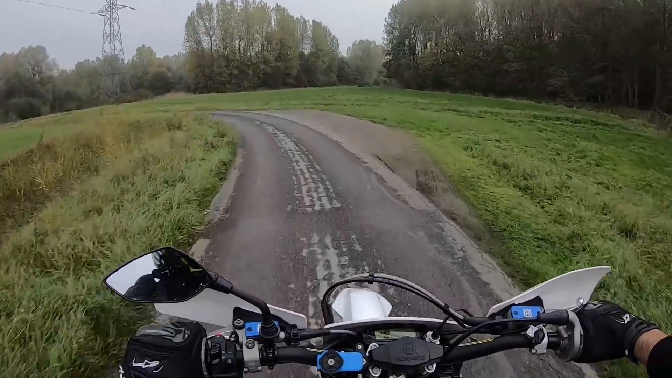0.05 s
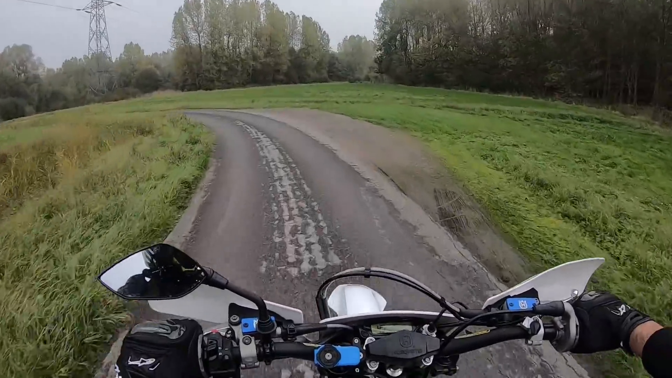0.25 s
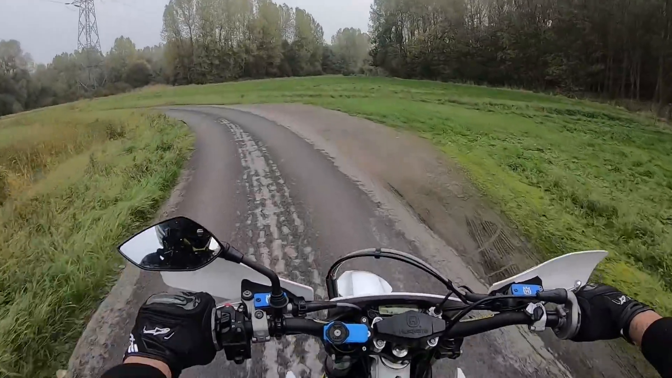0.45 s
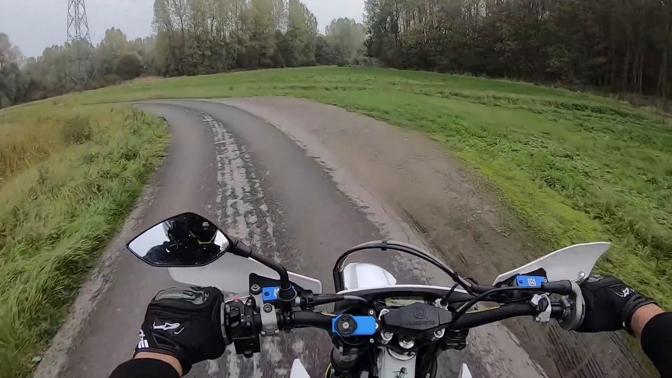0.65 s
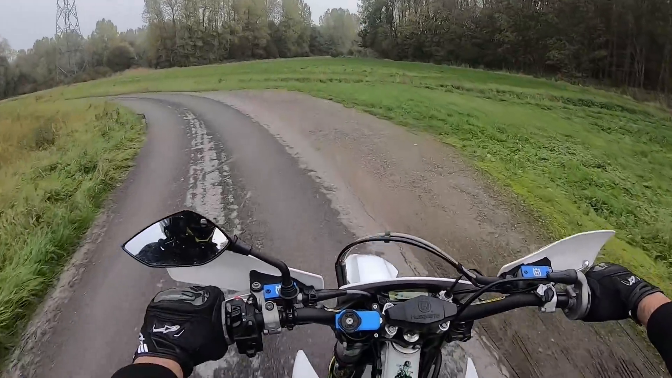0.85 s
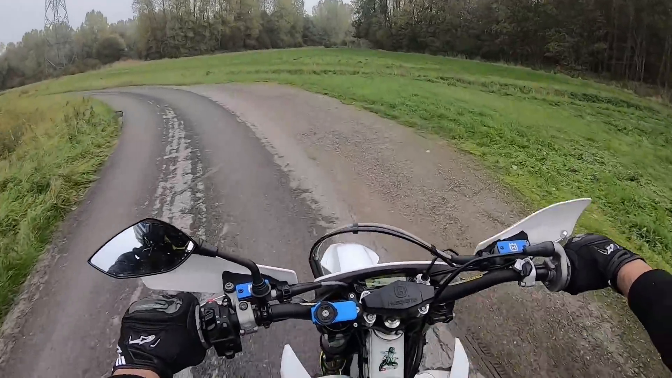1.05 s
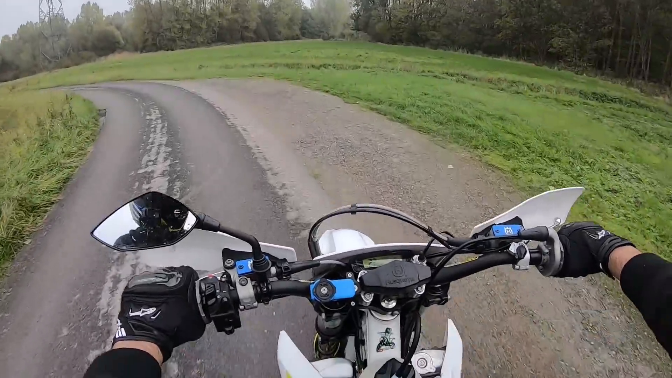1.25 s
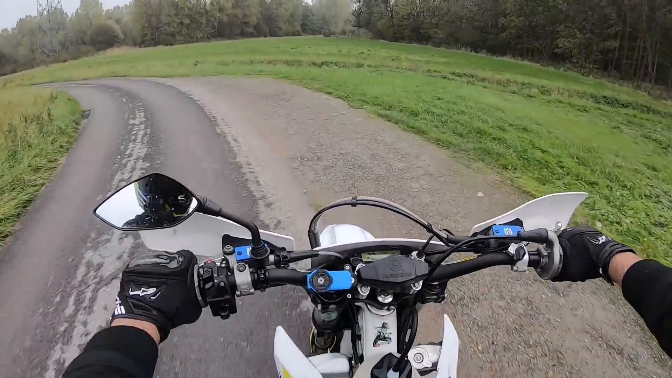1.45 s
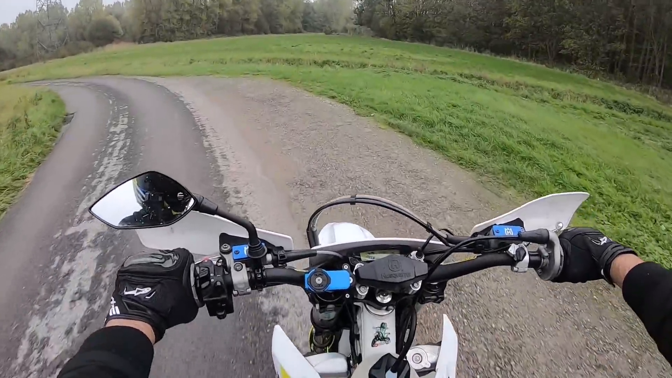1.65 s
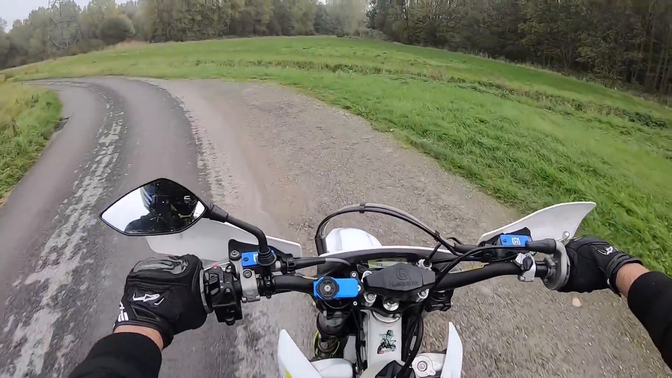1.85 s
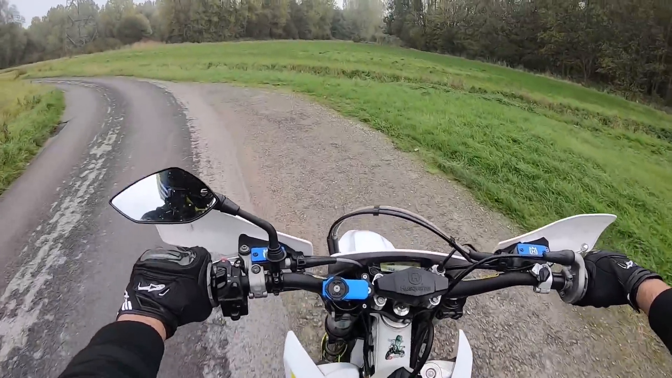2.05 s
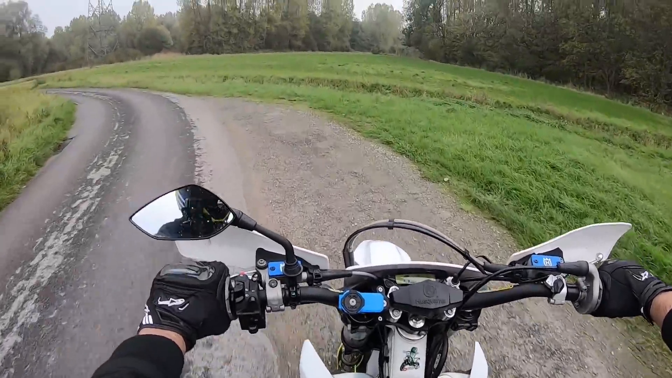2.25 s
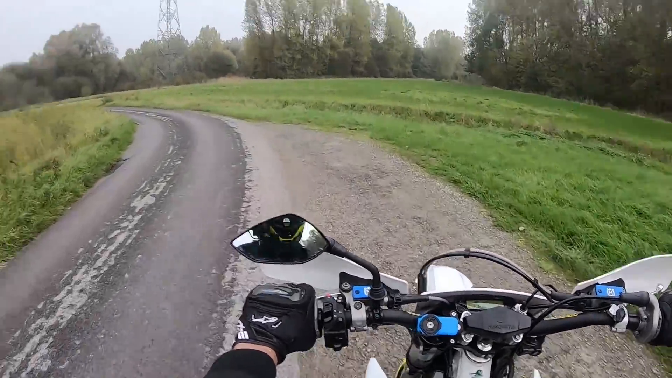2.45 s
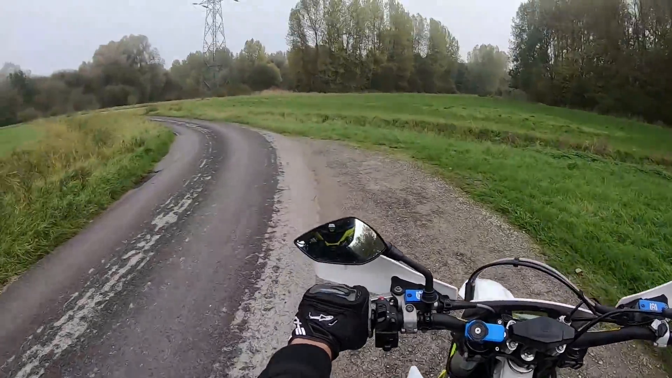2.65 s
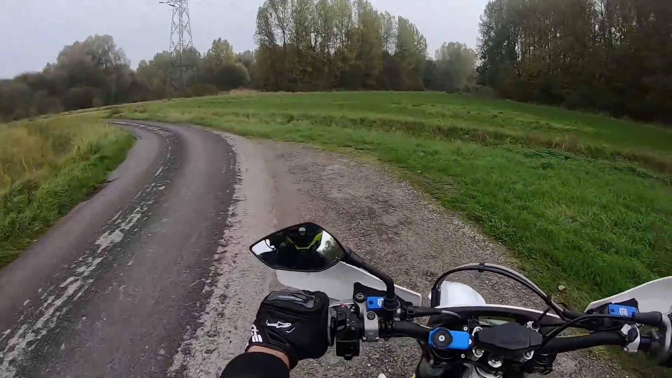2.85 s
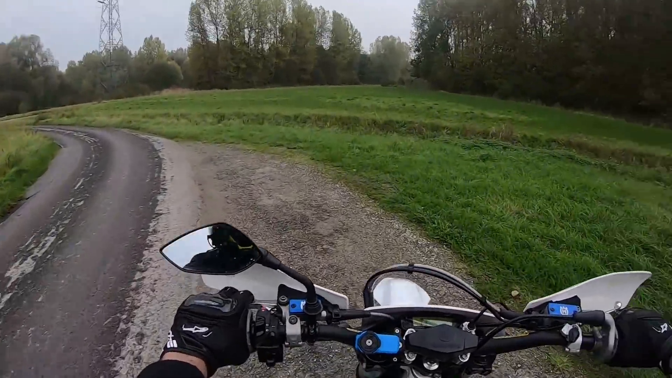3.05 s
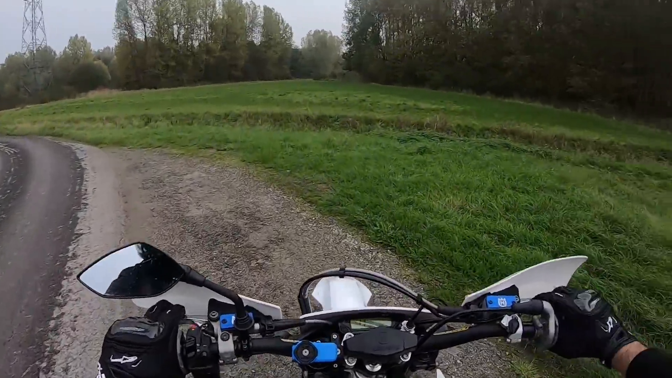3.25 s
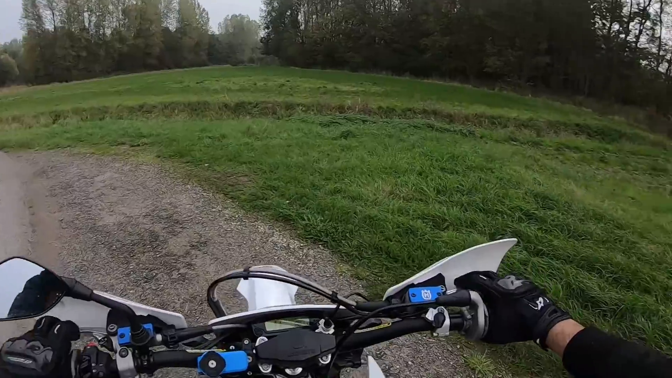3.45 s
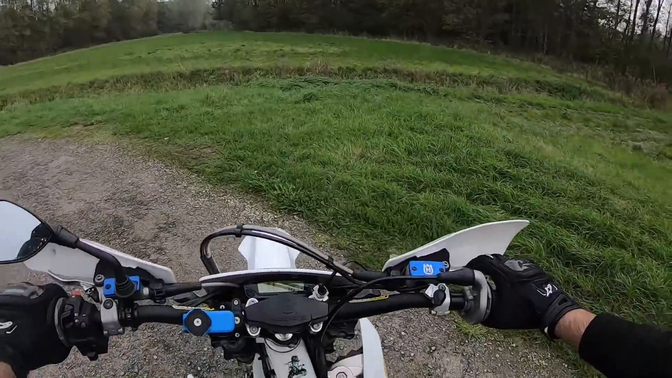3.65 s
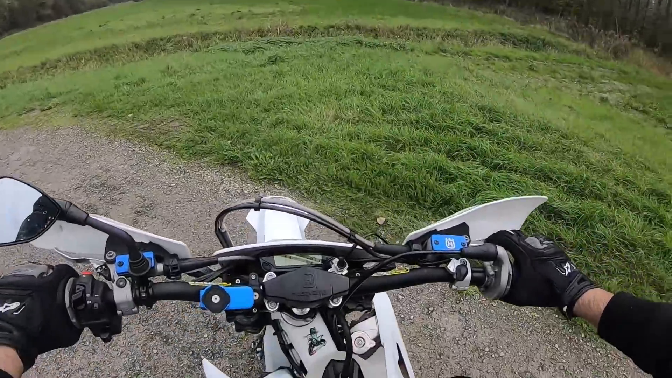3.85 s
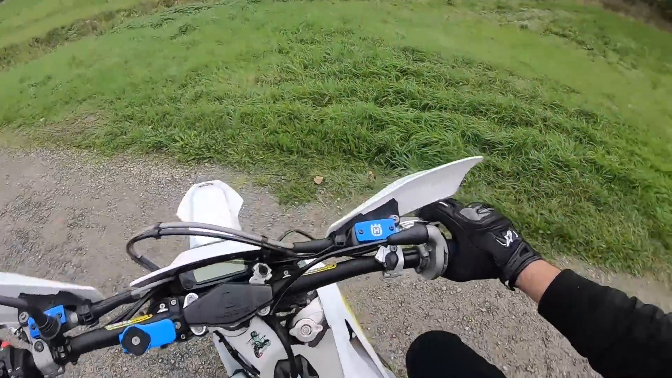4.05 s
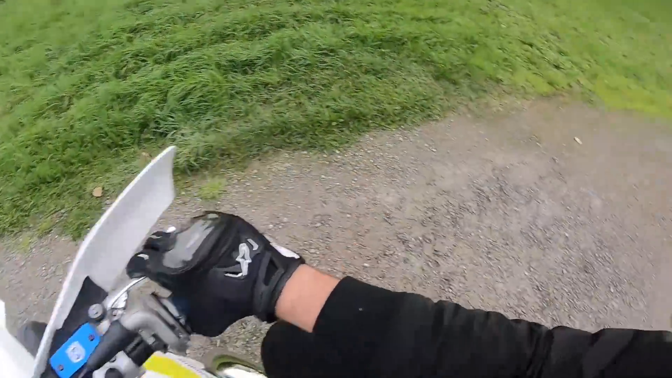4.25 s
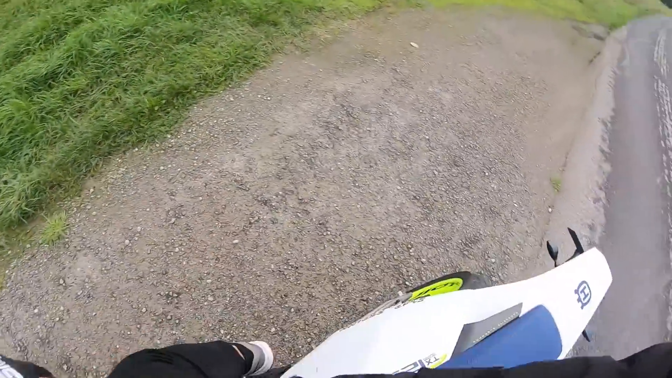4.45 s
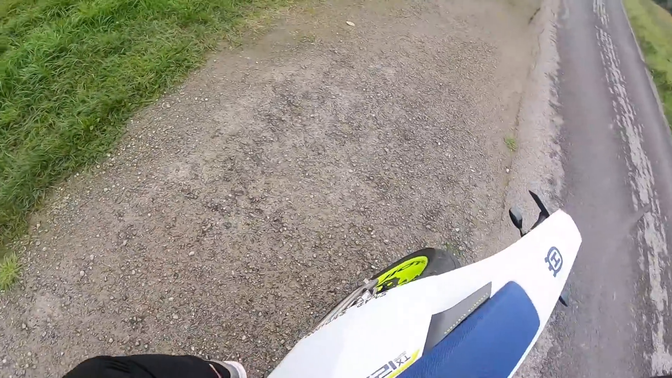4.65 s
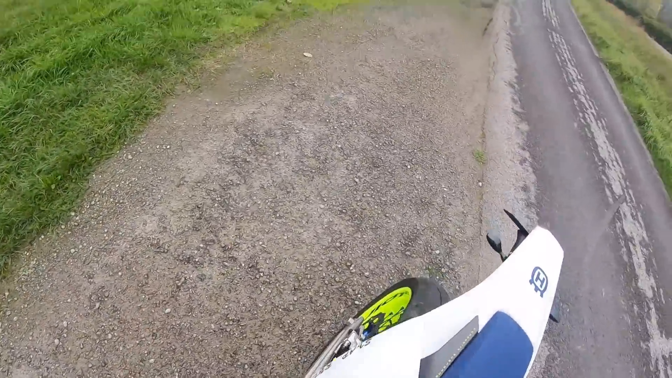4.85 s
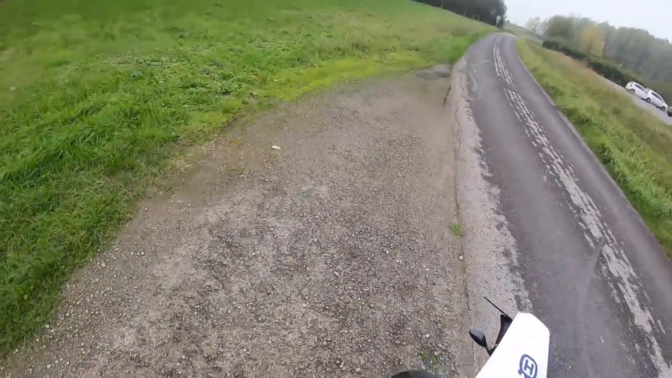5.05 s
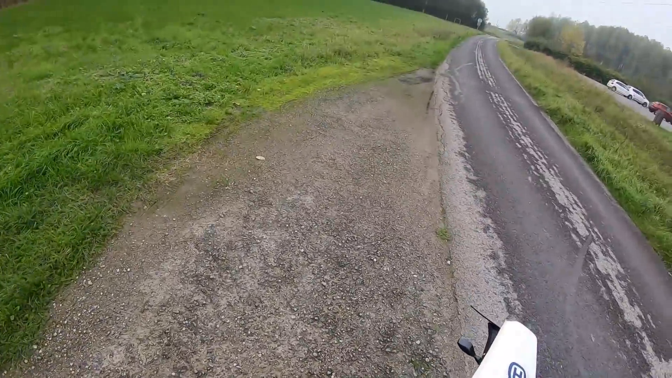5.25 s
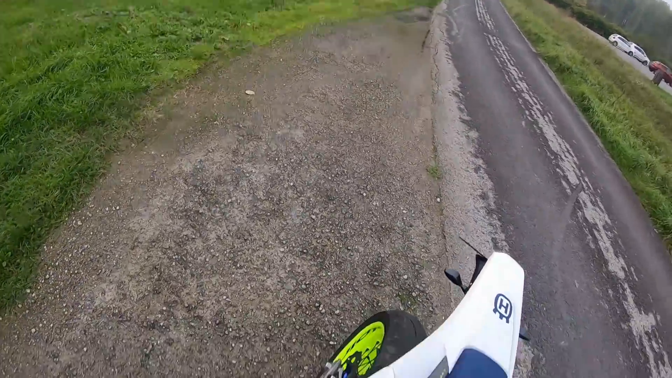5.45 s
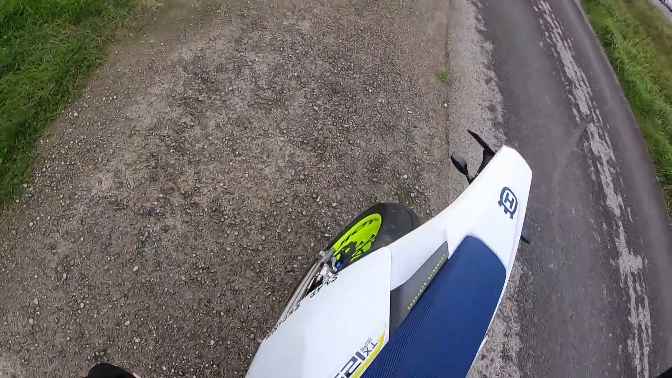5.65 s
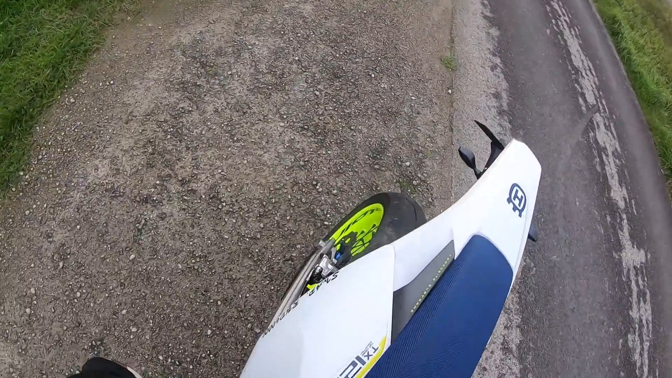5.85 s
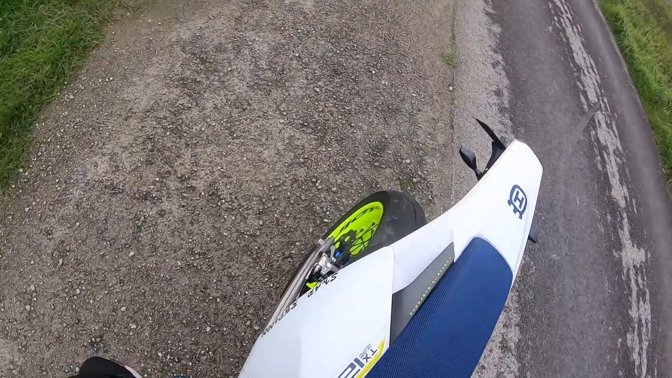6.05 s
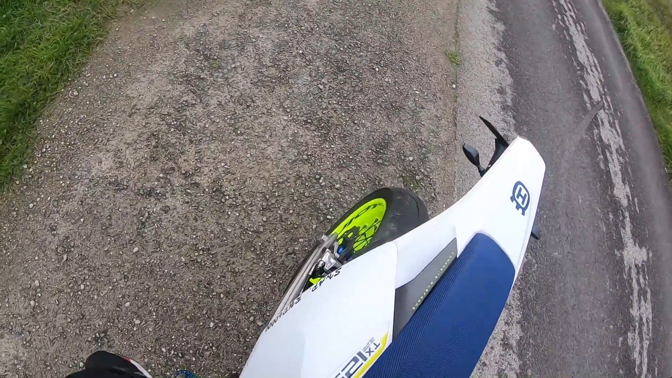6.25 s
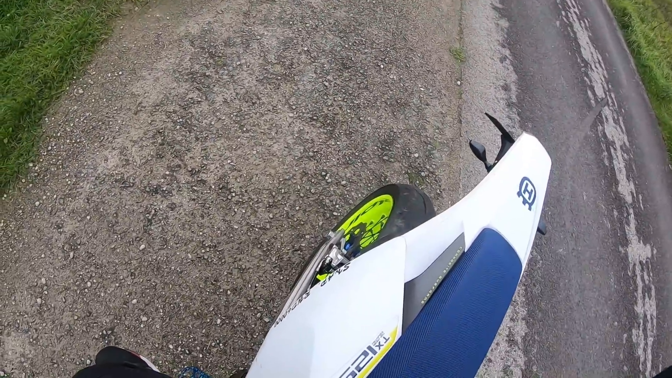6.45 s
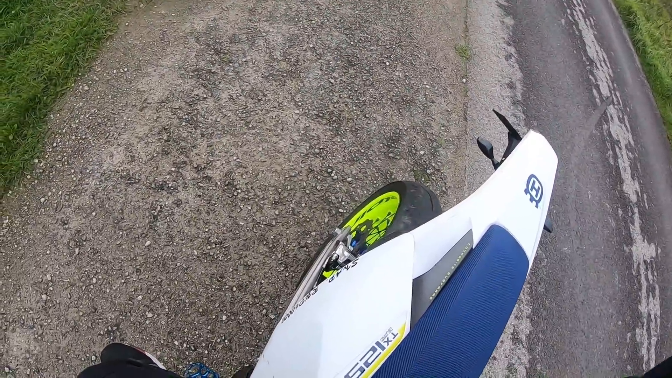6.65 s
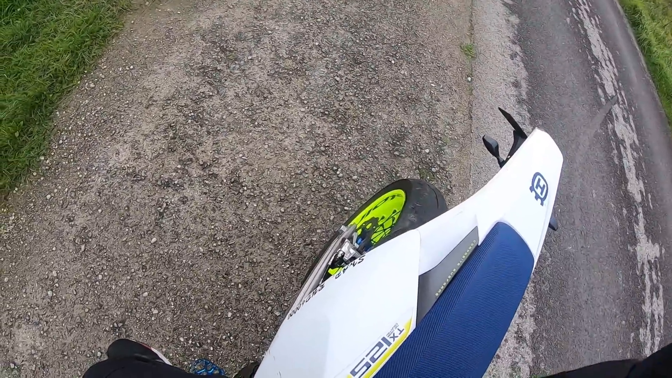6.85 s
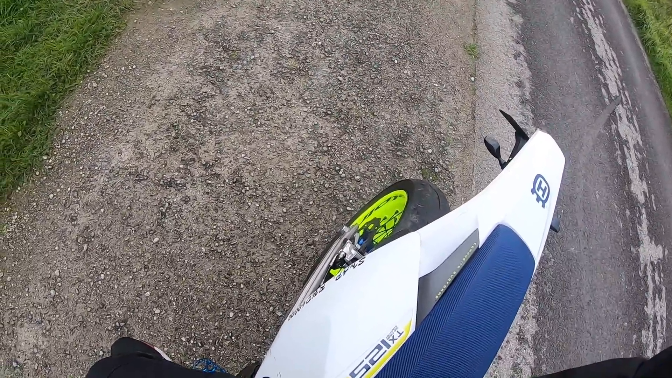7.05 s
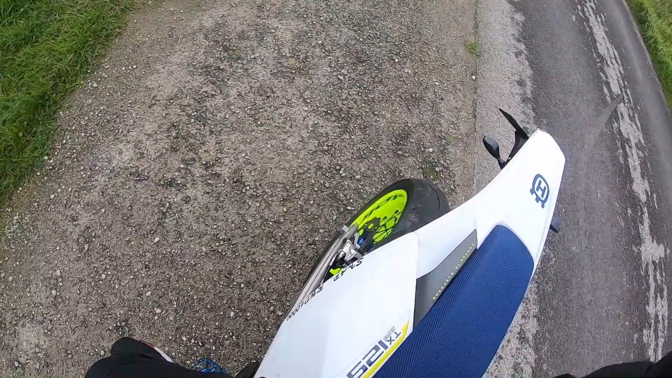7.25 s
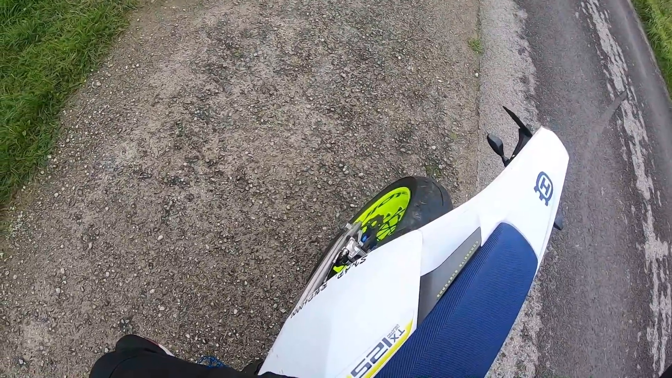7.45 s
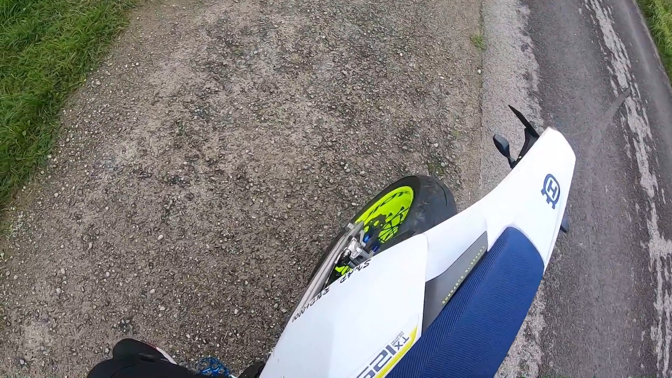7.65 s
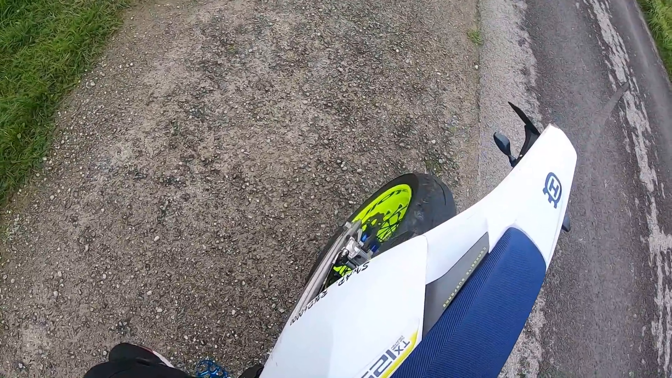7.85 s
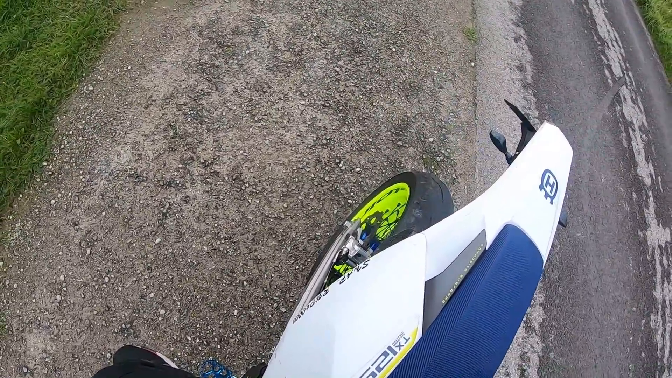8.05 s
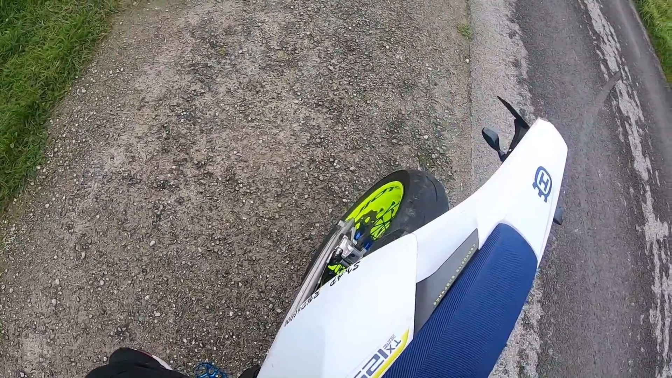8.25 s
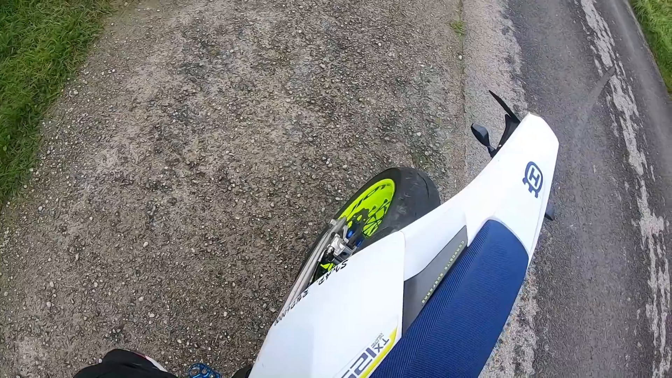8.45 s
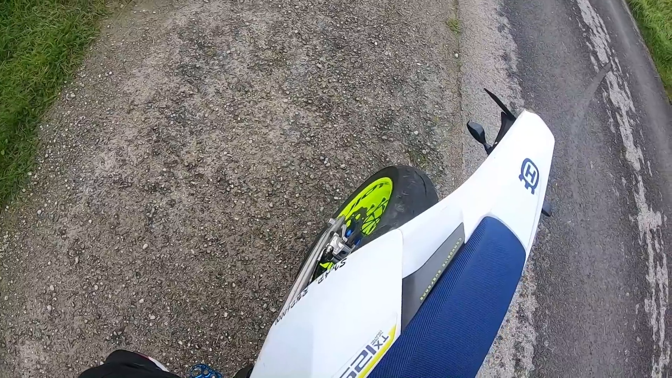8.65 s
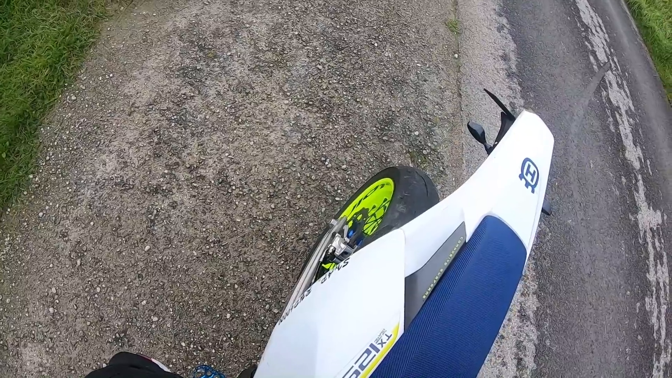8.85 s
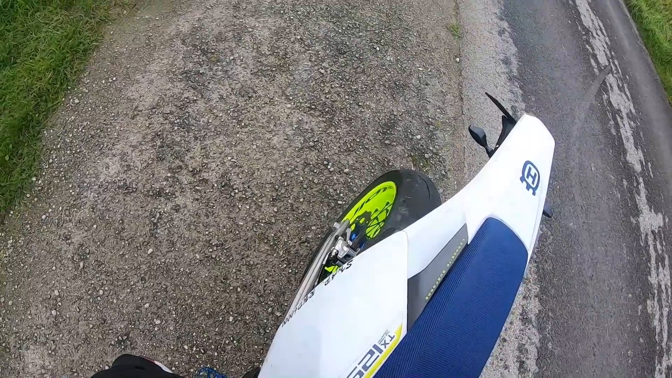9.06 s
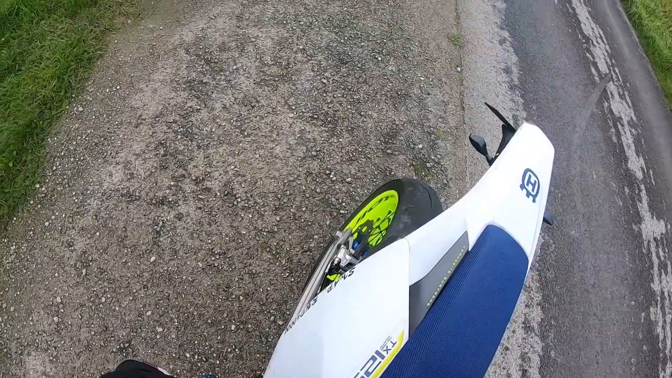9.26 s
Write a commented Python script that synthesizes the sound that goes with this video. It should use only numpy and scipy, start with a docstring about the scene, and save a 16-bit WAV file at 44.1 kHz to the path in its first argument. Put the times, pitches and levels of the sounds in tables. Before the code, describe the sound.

Heard from the rider's helmet, a small dirt bike hums down, putters irregularly at idle, then revs sharply three times, ending in a held, choppy scream.

```python
"""Two-stroke motorcycle idling and revving

A small two-stroke, heard from the rider's helmet, coasts to a stop under a droning hum, tyre roar and rattle.
It idles, firing only every few turns: each firing cracks and thumps, and unfired turns ring the air column.
Three throttle blips in neutral follow, the last into the rev limiter: crank orders plus rasp gated each turn.
Low noise buffets the microphone and fades during the blips, and a low rumble swells again with the rough
burning against the limiter; a squeak of metal whistles once near the end of the idle."""
import sys
import numpy as np
from scipy import signal
from scipy.fft import rfft, irfft, next_fast_len
from scipy.io import wavfile
from scipy.ndimage import uniform_filter1d, map_coordinates

SR = 44100
rng = np.random.default_rng(int(sys.argv[2]) if len(sys.argv) > 2 else 0)


def convert_level_to_amplitude(level_db):
    """Map a level in decibels to its linear amplitude factor."""
    exponent = np.asarray(level_db, float) / 20
    return 10 ** exponent


def generate_wav(signal):
    """Clip the signal to [-1, 1] and save it as 16-bit WAV at the path in sys.argv[1]."""
    frames = np.transpose(np.atleast_2d(signal))
    scaled = np.clip(frames, -1, 1) * 32767
    pcm = np.round(scaled).astype(np.int16)
    wavfile.write(sys.argv[1], SR, pcm)


N = 410130
T = np.arange(N) / SR  # time of each sample, s

# coasting down: time_s, crank_hz (turns per s), drone_db
COASTING = [(.04, 61.5, -16.5), (.22, 56, -17.5), (.58, 46.5, -21.5), (.81, 40.2, -24), (.95, 36.5, -16.5),
            (1.05, 33.8, -25)]
# mean idle speed: time_s, crank_hz
IDLING = [(1.23, 33), (1.4, 38), (1.6, 43), (1.75, 46), (2.3, 48), (2.55, 44), (2.8, 40), (3.1, 38.5),
          (4.5, 40), (5.3, 41.5), (5.85, 42.5)]
# speed through the throttle blips: time_s, crank_hz
REVVING = [(5.898, 39), (5.96, 49), (6.031, 60.9), (6.12, 90.1), (6.19, 125), (6.249, 139), (6.31, 132.6),
           (6.501, 126.7), (6.69, 117.3), (6.72, 118.5), (6.761, 135), (6.87, 201), (6.91, 216),
           (6.99, 223), (7.03, 227), (7.29, 206.9), (7.57, 187.7), (7.92, 165.3), (8.22, 149.2),
           (8.37, 143.6), (8.419, 143), (8.49, 185), (8.52, 205), (8.59, 220.5), (8.67, 225), (8.95, 231.7),
           (9.3, 228)]
# throttle blips: throttle_opens_s, charge_catches_s, throttle_shuts_s
BLIPS = [(5.85, 5.907, 6.12), (6.64, 6.705, 7.038), (8.318, 8.401, 9.5)]

# burning under an open throttle: crank_hz, order1_db, order2_db, order3_db, order4_db,
# upper_orders_db, rasp_db, clatter_db
OPEN_THROTTLE = [(45, -22, -6, -2.5, -4, -36, -54, -28), (86.6, -33, -9.5, -12.5, -26, -49, -51, -25),
                 (116.5, -23, -8.5, -40, -16, -49, -49.5, -21),
                 (131.5, -10, -20, -11.5, -24.5, -28.5, -29, -21),
                 (166.4, -9, -25, -18, -20, -36, -27, -31.5), (187, -7.5, -23, -18.5, -34, -31, -28.5, -40),
                 (206.83, -8.5, -20, -16.5, -37, -31.5, -32, -46),
                 (221.5, -14.5, -12.5, -27, -30, -36.5, -41.5, -47),
                 (226.2, -12.5, -13, -33, -39.5, -39.5, -45.5, -26.5)]
# freewheeling under a shut throttle: same columns
SHUT_THROTTLE = [(116, -18, -23.5, -46, -26, -47.5, -56, -38),
                 (127.4, -19.5, -30.5, -43, -33, -48.5, -52, -41),
                 (135.4, -19, -37, -39, -43, -61, -63.5, -41),
                 (138.5, -11, -31, -31, -28, -46, -47.5, -26.5),
                 (156.4, -11, -26, -44, -39, -43, -46.5, -38.5),
                 (174, -10, -20.5, -37, -38, -46.5, -46, -38.5),
                 (189, -11.5, -30, -47.5, -45.5, -45.5, -48, -35.5),
                 (197, -19, -24, -51, -48, -45, -47, -37), (199.9, -31, -24.5, -40, -47, -45, -47.5, -37),
                 (204.6, -17.5, -31, -46, -46, -44, -49, -40), (216, -10.5, -39, -45, -50, -51, -49, -41.5),
                 (226.6, -8.5, -29.5, -32, -41, -45, -48, -44)]
# intake honk while it gulps air before the charge catches: level_db of orders 1 to 4
HONK_DB = [-47, -9, -20.5, -31]
# uneven burning, each blow unlike the last: crank_hz, blow_scatter (0-1)
UNEVEN_BURNING = [(45, .2), (75, .06), (115, .06), (130, .1), (150, .1), (170, .02), (222, .02),
                  (229, .035)]
# turns that the rev limiter leaves unfired: time_s
LIMITER_CUTS = [8.723, 8.845, 8.902, 8.959, 9.031, 9.107, 9.197, 9.26]

# turns that fire at idle: time_s, crack_db
IDLE_FIRINGS = [(1.0809, -35), (1.231, -33.5), (1.322, -31.5), (1.4024, -33.5), (1.48, -29.5),
                (1.5572, -31.5), (1.631, -30.5), (1.7195, -31), (1.8059, -33.5), (1.8921, -36),
                (1.955, -32.5), (2.019, -33), (2.1005, -35), (2.2029, -31), (2.3063, -38), (2.3926, -41),
                (2.5046, -34.5), (2.6413, -32.5), (2.7814, -32.5), (2.9077, -35), (3.0159, -33),
                (3.1483, -32.5), (3.3072, -33.5), (3.4355, -30), (3.563, -29), (3.6849, -34), (3.79, -30),
                (3.923, -28), (4.0529, -28.5), (4.1822, -28), (4.3113, -31.5), (4.4332, -33.5),
                (4.5306, -35.5), (4.6288, -33.5), (4.7299, -34.5), (4.8292, -36), (4.9326, -33.5),
                (5.061, -35.5), (5.183, -35.5), (5.3037, -35.5), (5.4222, -34.5), (5.5378, -36.5),
                (5.631, -35.5), (5.7495, -33.5), (5.8662, -34)]
# sharp firings while revving: time_s, crack_db
REV_FIRINGS = [(5.9604, -32), (6.227, -27), (6.715, -31), (7.0184, -30), (8.4014, -27.5), (8.6914, -26),
               (8.761, -28.5), (8.813, -27.5), (8.8304, -26), (8.8913, -25), (8.9312, -33.5),
               (8.9482, -26.5), (9.0005, -27), (9.0185, -30.5), (9.0574, -31), (9.0968, -25.5),
               (9.1372, -27.5), (9.1771, -29), (9.1851, -28.5), (9.238, -26.5), (9.2869, -33)]
# casing modes rung by a firing: mode_hz, level_db, t60_s
CASING_MODES = [(2620, -8, .06), (3150, -6, .07), (4150, -2, .11), (6210, -6, .08), (7200, -5, .05)]
# gulp of gas on each unfired idle turn, and on every turn through the first blip; the rings grow as the rider
# turns to the tail pipe: # time_s, level_db, main_ring_hz, main_ring_t60_s, middle_ring_db, upper_ring_db
GULPS = [(1, -30, 214, 0.045, -26, -32), (1.18, -25, 215, .05, -24, -31), (1.22, -1, 207, 0.062, -22, -21),
         (1.7, -1.5, 212, 0.074, -20, -17), (2.2, -8.5, 224.7, 0.2, -17, -16.5),
         (2.6, -6.5, 199.5, 0.064, -32, -24), (3.4, -8.5, 203, 0.05, -37, -27),
         (4.2, -7, 199, 0.034, -18, -22), (4.8, -6.5, 174.8, 0.088, -13.5, -13),
         (5.86, -5, 189, 0.06, -7.5, -12), (5.93, 1, 239, 0.089, 0.5, -12), (6.1, -4, 229, 0.11, 5, -3.5),
         (6.24, -9, 221, 0.026, -6.5, -5.5)]

# tone of the upper exhaust orders through the pipe: freq_hz, gain_db
PIPE_TONE = [(290, -37), (500, 22), (677, -1.5), (900, -8.5), (1140, -5.5), (1600, -16.5), (1790, -18.5),
             (2220, -11.5), (2780, -19), (3400, -21.5), (4300, -21.5), (5200, -35.5), (6760, -32.5),
             (11400, -120)]
# bright rasp of burning: freq_hz, relative_db
RASP_TONE = [(590, -25), (1000, -1.5), (1290, 12), (1780, -47), (2310, 13), (2750, -0.5), (3270, 7),
             (4890, -5), (5540, 3.5), (6740, -3), (7220, -0.5), (9630, -6.5), (15600, -11)]
# dull hiss of the unburnt charge: freq_hz, relative_db
OVERRUN_TONE = [(880, -34.5), (1500, -52), (1740, -40), (2160, -1), (2810, -20.5), (3130, -1.5),
                (3660, -11), (4000, -8.5), (4770, -18), (5470, -8), (6650, -15.5), (7550, -11.5),
                (15600, -29)]
# crack of a firing: freq_hz, relative_db
CRACK_TONE = [(590, -5), (1000, 2.5), (1680, -10), (2040, 1.5), (3580, -2.5), (4310, -3), (4890, -10.5),
              (7480, -0.5), (8580, -8.5), (15600, -13)]
# knock of the piston just before a firing: freq_hz, relative_db
KNOCK_TONE = [(700, -24), (1150, 5), (1700, 0), (2200, -4), (3200, -2.5), (4800, -15), (7500, -17.5),
              (15600, -32)]
# orders of the coasting hum: crank_multiple, relative_db
HUM_ORDERS = [(1, -6), (2, 0), (3, -0.5), (4, -1), (5, -0.5), (6, -1), (7, -13.5), (8, -21.5)]
# tyre roar: freq_hz, relative_db
ROAR_TONE = [(30, -9), (60, 2.5), (250, 1), (420, -9.5), (700, -45.5), (1500, -58.5), (9000, -110)]
# engine clatter: freq_hz, relative_db
CLATTER_TONE = [(70, -31), (140, 8), (300, -5), (345, -6), (420, -3), (600, -6), (760, -13.5),
                (1220, -18.5), (1730, -34), (2200, -26), (3090, -31), (4990, -43.5), (7410, -41.5),
                (15600, -75.5)]
# engine clatter before the blips: time_s, level_db
LOW_SPEED_CLATTER = [(0, -25.5), (.5, -27.5), (1.1, -30.5), (2.2, -30), (4.2, -29.5), (4.9, -32),
                     (5.85, -31.5)]
# rattling bursts as the bike slows: start_s, length_s, level_db
RATTLE_BURSTS = [(0.269, 0.012, -23), (0.322, 0.026, -17.5), (0.387, 0.04, -20.5), (0.457, 0.0092, -21.5),
                 (0.537, 0.0098, -15.5), (0.582, 0.08, -17), (0.726, 0.074, -17.5), (0.871, 0.012, -14.5)]
# rattle: freq_hz, relative_db
RATTLE_TONE = [(180, 10), (300, 11.5), (441, 1), (577, -4), (937, 0.5), (1300, -4.5), (1800, -22),
               (2230, -14.5), (9000, -50), (11700, -76), (19800, -120)]
# low rumble strength, wind buffeting at first, rough burning against the limiter late on: time_s, level_db
RUMBLE_LEVEL = [(0, -17), (.7, -15), (.96, -22), (4.5, -22.5), (5.5, -22), (5.62, -16), (5.93, -26.5),
                (6.1, -33.5), (6.4, -77), (6.8, -47), (7.03, -35), (7.15, -62.5), (8.33, -56), (8.43, -43),
                (8.6, -41), (8.7, -29.5), (9.3, -23.5)]
# low rumble: freq_hz, relative_db
RUMBLE_TONE = [(4, -10), (10, 0), (18, -5), (35, -12), (70, -18), (150, -27), (400, -43), (900, -70),
               (8000, -72), (14000, -80)]

CATCH_S, SHUT_S = 0.014, 0.04  # how long burning takes to start and to stop
LOW_RING_DB = -8.5  # beside the main ring of a gulp
THUMP_DB, SILENCER_DB = -7.5, -13.5  # parts of an idle firing
PIPE_DB, PING_DB = -0.5, -17  # over the middle ring of the gulps
CUT_DEPTH = 0.78  # share of the blow lost on an unfired turn
CUT_CLATTER_DB, CUT_CLATTER_S = -22.5, 0.0048  # an unfired turn jolts the engine
BURST_RISE_S, BURST_FALL_DB_PER_S = 0.012, 503
SQUEAK_S, SQUEAK_LENGTH_S, SQUEAK_HZ, SQUEAK_DB = 5.235, 0.081, 2360, -43


def unit(x):
    """Scaled to rms 1."""
    return x / np.sqrt(np.mean(x ** 2) + 1e-20)


def along(points, hz):
    """Reads (Hz, value) points on a log frequency axis."""
    f, v = np.transpose(points)
    return np.interp(np.log(hz + 1), np.log(f + 1), v)


def curves(rows):
    """One value per sample for each column after the time."""
    s, *cols = np.transpose(rows)
    return [np.interp(T, s, c) for c in cols]


def wobble(rate):
    """A smooth random curve, rate knots a second."""
    knots = rng.standard_normal(int(N * rate / SR) + 4)
    return map_coordinates(knots, [T * rate])


def coloured(x, spectrum):
    """x through a (Hz, dB) spectrum, at rms 1."""
    m = next_fast_len(N + 8192)
    gain = convert_level_to_amplitude(along(spectrum, np.fft.rfftfreq(m, 1 / SR)))
    return unit(irfft(rfft(x, m) * gain, m)[:N])


def noise(spectrum):
    """Steady noise with a (Hz, dB) spectrum, at rms 1."""
    return coloured(rng.standard_normal(N), spectrum)


def ring(t, hz, t60):
    """A damped sine."""
    return convert_level_to_amplitude(-60 * t / t60) * np.sin(2 * np.pi * hz * t)


def add(track, s, sound):
    """Mixes a short sound in at a time."""
    part = track[max(round(s * SR), 0):][:len(sound)]
    part += sound[:len(part)]


def step(s, width):
    """A ramp from 0 to 1 centred on a time."""
    return np.clip((T - s) / width + .5, 0, 1)


def crank(drag=70):
    """Turns of the crank: whole turns lie between firings, each firing kicks it and drag (turns per s2) slows it."""
    speed, = curves([row[:2] for row in [*COASTING, *IDLING, *REVVING]])
    turns = np.cumsum(speed) / SR
    fired = np.transpose(IDLE_FIRINGS)[0]
    free = np.interp(fired, T, turns)
    whole = np.round(free[0]) + np.cumsum(np.round(np.diff(free, prepend=free[0])))
    after = np.clip(np.searchsorted(fired, T), 1, len(fired) - 1)
    since, until = T - fired[after - 1], fired[after] - T
    kick = drag / 2 * np.clip(since * until, 0, None)
    return speed, turns + np.interp(T, fired, whole - free) + kick


def throttle():
    """Share of burning turns, and the intake's honk from opening until the charge catches."""
    burn = sum(step(catch, CATCH_S) - step(shut, SHUT_S) for _, catch, shut in BLIPS)
    honk = 0
    for opens, catch, _ in BLIPS[1:]:
        swell = step((opens + catch) / 2, catch - opens)
        honk = honk + swell * (1 - step(catch + CATCH_S / 2, CATCH_S))
    return burn, honk


def by_speed(rows, speed):
    """Each column after the first, read at the crank speed."""
    hz, *cols = np.transpose(rows)
    return np.array([np.interp(speed, hz, c) for c in cols])


def exhaust_note(speed, turns, count=42):
    """Steady firing: strong low orders, upper orders coloured by the pipe, and a rasp gated once a turn."""
    on = T >= REVVING[0][0]
    burn, honk = throttle()
    burning = burn * convert_level_to_amplitude(by_speed(OPEN_THROTTLE, speed))
    idle = (1 - burn) * convert_level_to_amplitude(by_speed(SHUT_THROTTLE, speed))
    # blowdown and mere pumping push in opposite phase, and so does the intake: orders dip as one takes over
    low_gain = (burning[:4] - idle[:4] + honk * convert_level_to_amplitude(HONK_DB)[:, None])[:, on]
    upper_gain, rasp_gain = (burning + idle)[4:6, on]

    angle, hz = 2 * np.pi * turns[on], speed[on]
    lag = 1.356 * (1 - hz / 230)  # the orders fall into step as speed nears the pipe's tuning
    low = sum(np.sqrt(2) * gain * np.cos(k * angle - lag * k * k) for k, gain in enumerate(low_gain, 1))

    # small timing scatter smears the high orders most
    loose = 1 - .6 * burn[on]
    shake = .026 * loose * wobble(45)[on]
    high, power = 0, 0
    for k in range(5, count):
        pipe_db = along(PIPE_TONE, k * hz)
        flicker_db = 5 * loose * wobble(13)[on]
        high = high + convert_level_to_amplitude(pipe_db + flicker_db) * np.cos(k * (angle + shake) - .3 * k * k)
        power = power + convert_level_to_amplitude(pipe_db) ** 2 * (abs(k * hz - 1850) < 750)
    band = np.sqrt(power / 2 + 1e-9)  # rms of the orders around 1850 Hz
    upper = upper_gain * high / uniform_filter1d(band, size=999)

    miss = 1 - sum(CUT_DEPTH * np.exp(-((T[on] - s) / 0.0023) ** 2) for s in LIMITER_CUTS)
    draws = rng.standard_normal(int(turns[-1]) + 2)  # no two blows alike
    luck = uniform_filter1d(draws[turns[on].astype(int)], size=60)
    scatter = .01 + burn * by_speed(UNEVEN_BURNING, speed)[0]
    blows = miss + scatter[on] * luck

    # a strong rasp is bright and sharply gated
    blast = np.clip(np.log(rasp_gain / convert_level_to_amplitude(-42.5)) / np.log(convert_level_to_amplitude(17.5)), 0, 1)
    gate = .3 + convert_level_to_amplitude(2.5 * luck) * np.exp(2.5 * (np.cos(angle - 1) - 1))
    bright = blast * unit(gate) * noise(RASP_TONE)[on]
    dull = (1 - blast) * unit(1.1 + gate) * noise(OVERRUN_TONE)[on]
    rasp = rasp_gain * (bright + dull)
    puff = convert_level_to_amplitude(-16) * (1 - miss)  # unburnt charge leaves as a soft push

    fade_in = np.clip((T[on] - REVVING[0][0]) / 0.29, 0, 1)
    out = np.zeros(N)
    out[on] = fade_in * (low * blows + miss * upper) + rasp + puff
    return out


def cracks(rows, t60, casing_db, tone):
    """A firing knocks the engine, then sends a hiss through the tail pipe and rings the casing."""
    knock, hiss, rings = np.zeros((3, N))
    t = T[:SR // 8]
    for s, db in rows:
        add(knock, s - .008, convert_level_to_amplitude(db - 4 - 60 * t / 0.035) * (1 - np.exp(-t / 0.003)))
        add(hiss, s - .001, convert_level_to_amplitude(db - 60 * t / t60) * (1 - np.exp(-t / 0.0012)))
        modes = sum(convert_level_to_amplitude(level + rng.normal(0, 6)) * ring(t, hz * rng.normal(1, .015), life)
                    for hz, level, life in CASING_MODES)
        add(rings, s, convert_level_to_amplitude(db + casing_db) * modes * (1 - np.exp(-t / .006)))
    return knock * noise(KNOCK_TONE) + hiss * noise(tone) + rings


def thumps():
    """The pressure front leaves the pipe just after the crack; air column, pipe and silencer ring on."""
    out, t = np.zeros(N), T[:SR // 10]
    _, ring_hz, _, pipe_db, _ = curves(GULPS)
    for s, _ in IDLE_FIRINGS:
        size, low = rng.standard_normal(2)
        i = round(s * SR)
        front = ring(t, ring_hz[i], 0.08) + .5 * np.exp(-((t - .0016) / 0.00054) ** 2)
        silencer = convert_level_to_amplitude(SILENCER_DB + 2 * low) * ring(t, 100.7, 0.099)
        pipe = convert_level_to_amplitude(PIPE_DB + pipe_db[i]) * ring(t, 435, 0.05)
        thump = convert_level_to_amplitude(THUMP_DB + 0.74 * size) * front + silencer + pipe
        add(out, s + 0.00266, thump * (1 - np.exp(-t / 0.00084)))
        ping = convert_level_to_amplitude(PING_DB + pipe_db[i]) * ring(t, 1211, 0.043)
        add(out, s - .008, ping * (1 - np.exp(-t / 0.0065)))
    return out


def gulps(turns):
    """Each unfired idle turn a port opens and the air column rings briefly; through the first blip the same
    gulp sounds on every turn."""
    level_db, ring_hz, t60, middle_db, upper_db = curves(GULPS)
    out, t = np.zeros(N), T[:SR // 16]
    starts = np.flatnonzero(np.diff(np.floor(turns[T < GULPS[-1][0]] - .19)) > 0)
    fired = np.transpose(IDLE_FIRINGS)[0] + .006
    for i in starts:
        if T[i] <= GULPS[0][0] or np.min(np.abs(fired - T[i])) <= .009:
            continue
        size, middle, upper, pitch = rng.standard_normal(4)
        middle_ring = convert_level_to_amplitude(middle_db[i] + 1.2 * middle) * ring(t, 470 + 12 * upper, .03)
        upper_ring = convert_level_to_amplitude(upper_db[i] + 1.2 * upper) * ring(t, 630 + 12 * pitch, .045)
        column = ring(t, ring_hz[i], t60[i]) + convert_level_to_amplitude(LOW_RING_DB) * ring(t, 150.4, 0.073)
        gain = convert_level_to_amplitude(level_db[i] + .7 * size)
        add(out, T[i], gain * column * (1 - np.exp(-(t / 0.0027) ** 2)))
        add(out, T[i] - .0015, gain * (middle_ring + upper_ring) * (1 - np.exp(-(t / 0.0032) ** 2)))
    return out


def drone(turns):
    """With the throttle shut and the wheel driving the engine, low orders hum unsteadily over tyre roar."""
    level_db = np.where(T < COASTING[-1][0] + .12, curves(COASTING)[1], -99)
    hum = unit(sum(convert_level_to_amplitude(db + 4 * wobble(5.7)) * np.cos(k * (2 * np.pi * turns - 0.402 * k))
                   for k, db in HUM_ORDERS))
    roar = convert_level_to_amplitude(2.5 * wobble(15)) * noise(ROAR_TONE)
    return convert_level_to_amplitude(level_db) * (.8 * hum + .6 * roar)


def clatter(speed, turns):
    """Piston, gears and fins: dull noise that throbs with the crank."""
    burn, _ = throttle()
    revving = burn * convert_level_to_amplitude(by_speed(OPEN_THROTTLE, speed)[6])
    revving += (1 - burn) * convert_level_to_amplitude(by_speed(SHUT_THROTTLE, speed)[6])
    revving += sum(convert_level_to_amplitude(CUT_CLATTER_DB) * np.exp(-((T - s) / CUT_CLATTER_S) ** 2) for s in LIMITER_CUTS)
    level = np.where(T < REVVING[0][0], convert_level_to_amplitude(curves(LOW_SPEED_CLATTER)[0]), revving)
    throb = 1 + .25 * np.cos(2 * np.pi * turns - 2.2)
    return level * convert_level_to_amplitude(1.4 * wobble(28)) * throb * noise(CLATTER_TONE)


def rattle():
    """Clumped short knocks: noise with a fast random level, let through in bursts."""
    level = 0
    for s, length, db in RATTLE_BURSTS:
        fall_db = BURST_FALL_DB_PER_S * np.clip(T - s - length, 0, None)
        level = level + step(s, BURST_RISE_S) * convert_level_to_amplitude(db - fall_db)
    knocks = rng.standard_normal(N) * convert_level_to_amplitude(1.5 * wobble(70) + 2 * wobble(300))
    return level * coloured(knocks, RATTLE_TONE)


def squeak():
    """A brief wavering whistle of rubbing metal."""
    shape = step(SQUEAK_S, .015) - step(SQUEAK_S + SQUEAK_LENGTH_S, .015)
    phase = 2 * np.pi * np.cumsum(SQUEAK_HZ + 60 * wobble(120)) / SR
    return convert_level_to_amplitude(SQUEAK_DB + 4 * wobble(150)) * shape * np.sin(phase)


def low_rumble():
    """Lumpy low rumble: low noise with a slow random swell, wind buffeting the microphone at first and rough
    burning against the rev limiter at the end."""
    lumps = unit(convert_level_to_amplitude(1.1 * wobble(7.2)) * noise(RUMBLE_TONE))
    return convert_level_to_amplitude(curves(RUMBLE_LEVEL)[0]) * lumps


def scene():
    """Engine, rattle, squeak and low rumble at one microphone."""
    speed, turns = crank()
    idle_cracks = cracks(IDLE_FIRINGS, 0.077, -12.5, CRACK_TONE)
    rev_cracks = cracks(REV_FIRINGS, 0.032, -38, RASP_TONE)
    engine = exhaust_note(speed, turns) + idle_cracks + rev_cracks + thumps() + gulps(turns)
    engine += drone(turns) + clatter(speed, turns)
    return (engine + rattle() + squeak() + low_rumble())[None]


def roll_off(x):
    """The treble ends steeply here."""
    return signal.sosfilt(signal.butter(12, 15750, fs=SR, output="sos"), x)


def record(dry):
    """Peaks are rounded off softly, then the top above 15.6 kHz is cut."""
    soft = dry / (1 + np.abs(dry / .97) ** 6) ** (1 / 6)
    low_pass = signal.butter(16, 15600, fs=SR, output='sos')
    mix = signal.sosfiltfilt(low_pass, soft)
    return roll_off(mix)


dry = scene()
out = record(dry)
generate_wav(out)
```